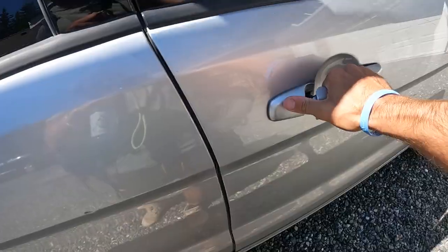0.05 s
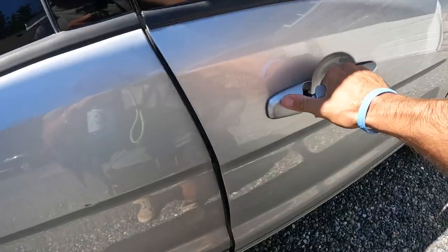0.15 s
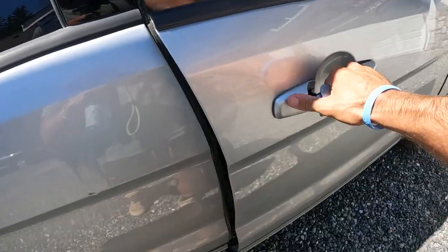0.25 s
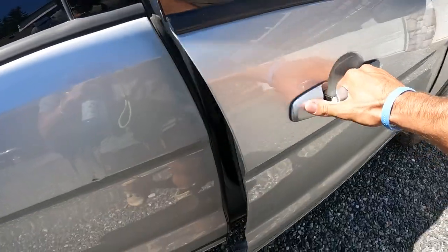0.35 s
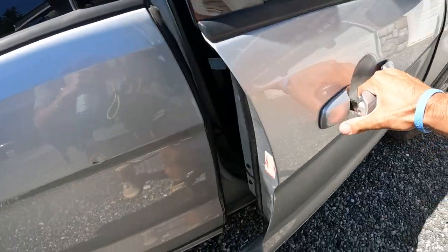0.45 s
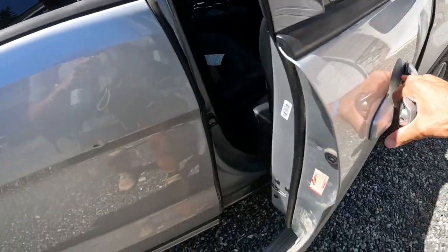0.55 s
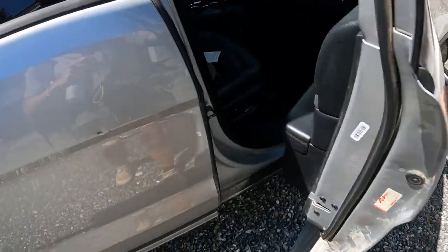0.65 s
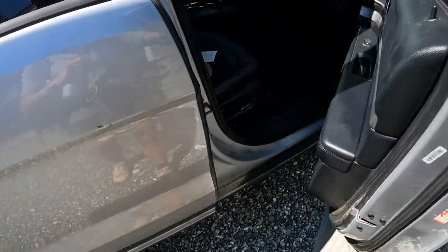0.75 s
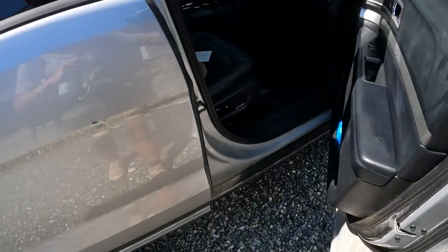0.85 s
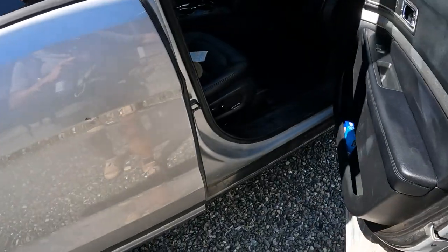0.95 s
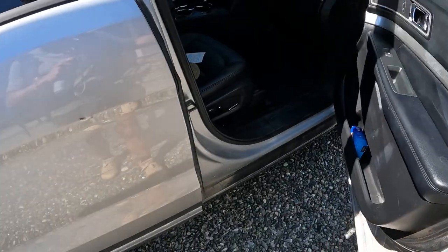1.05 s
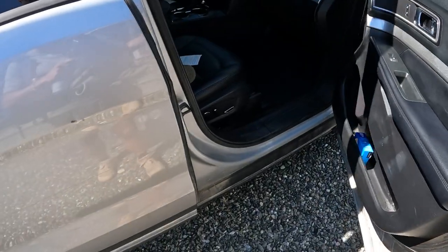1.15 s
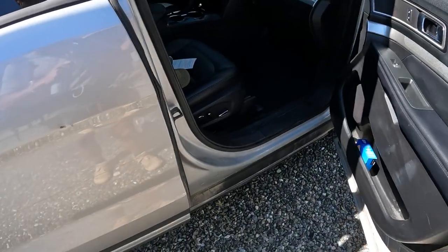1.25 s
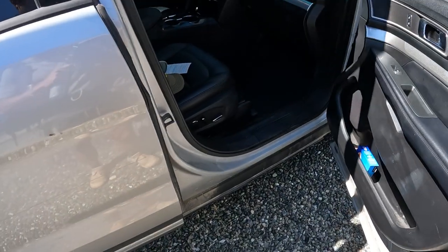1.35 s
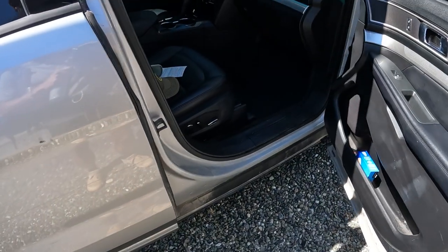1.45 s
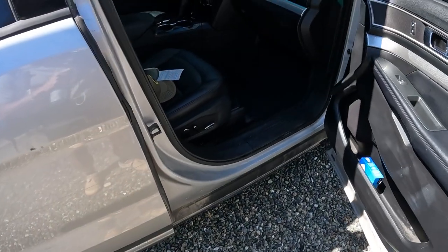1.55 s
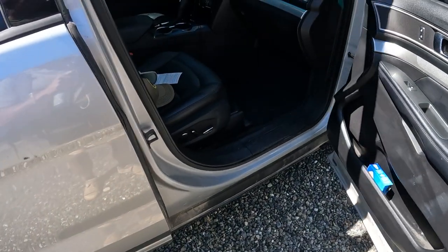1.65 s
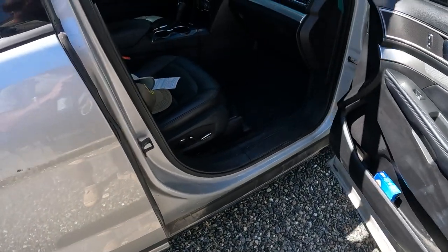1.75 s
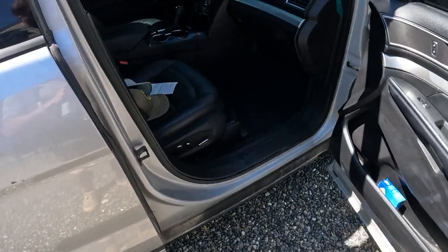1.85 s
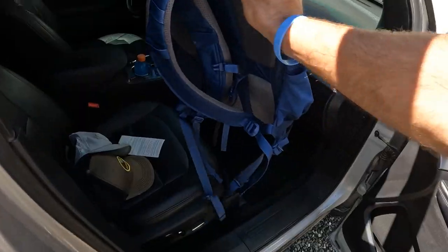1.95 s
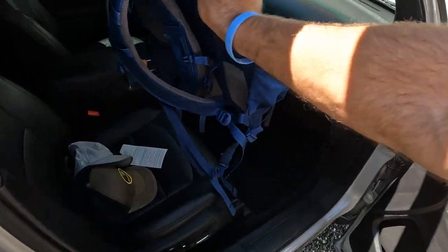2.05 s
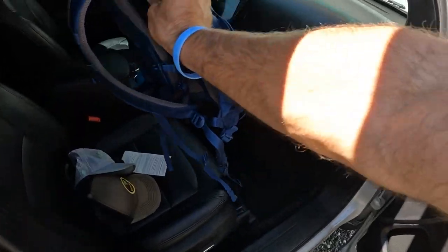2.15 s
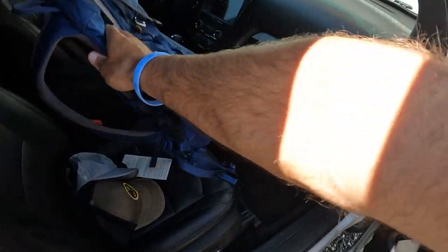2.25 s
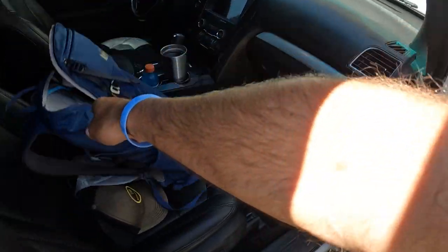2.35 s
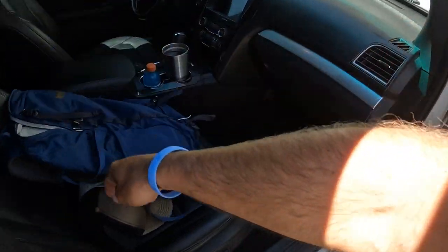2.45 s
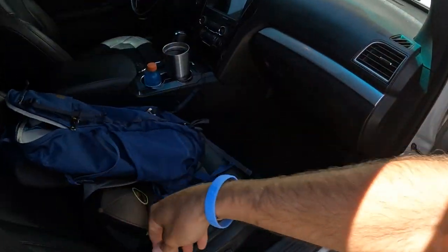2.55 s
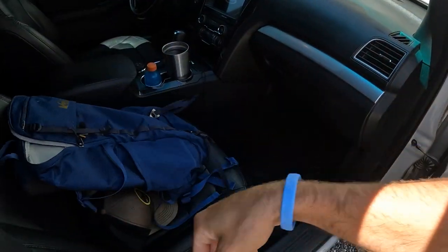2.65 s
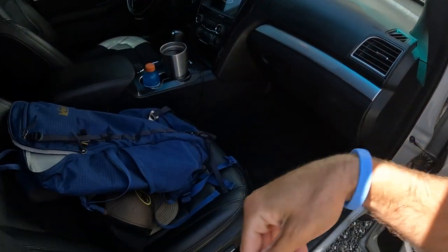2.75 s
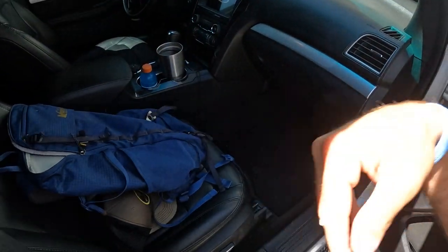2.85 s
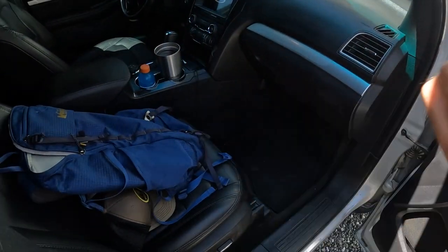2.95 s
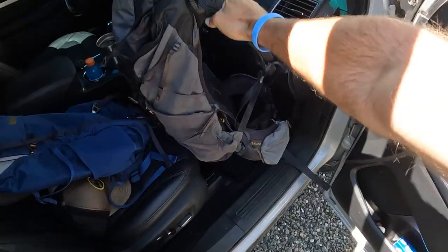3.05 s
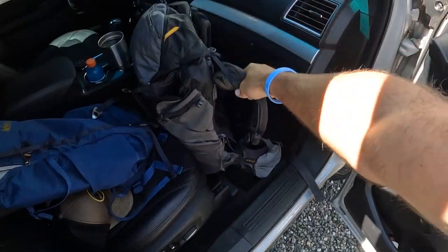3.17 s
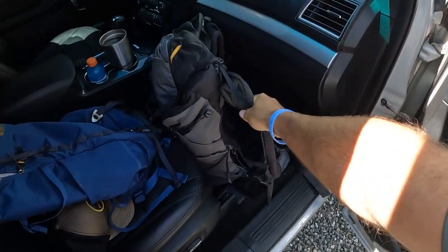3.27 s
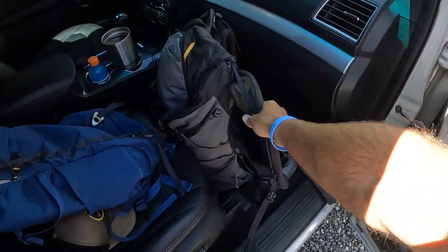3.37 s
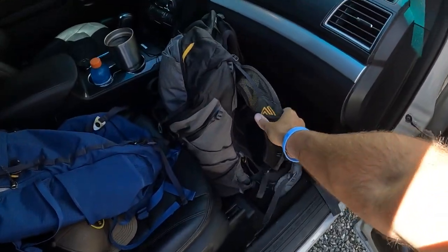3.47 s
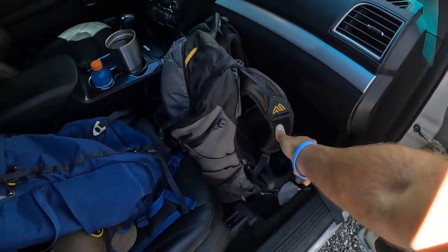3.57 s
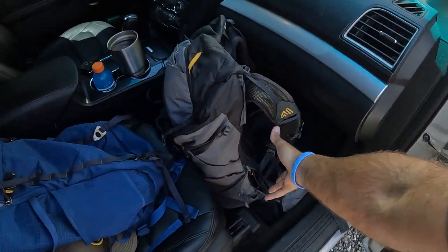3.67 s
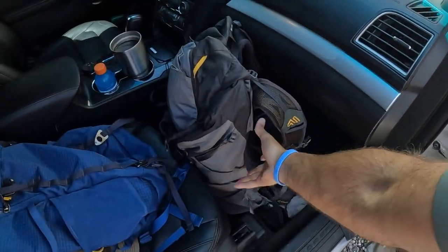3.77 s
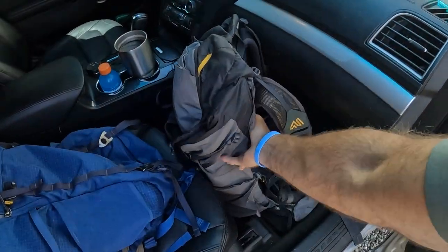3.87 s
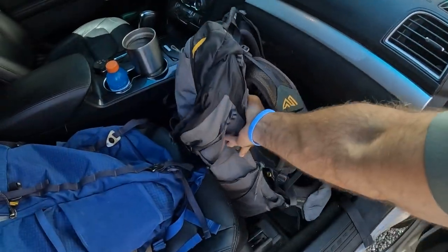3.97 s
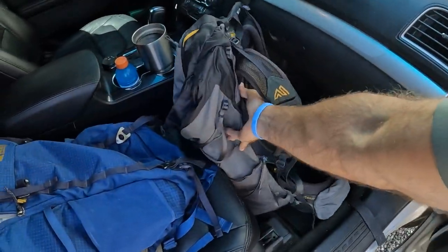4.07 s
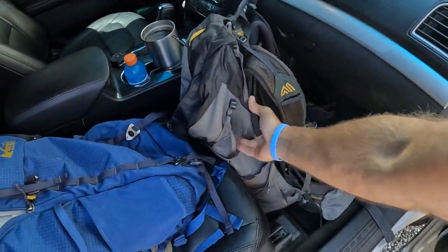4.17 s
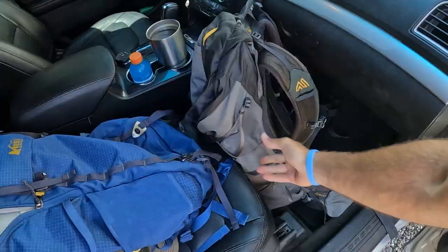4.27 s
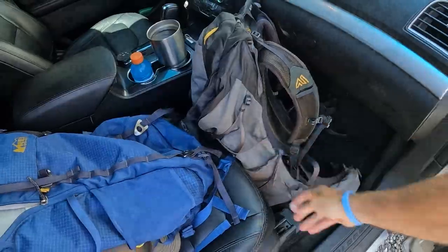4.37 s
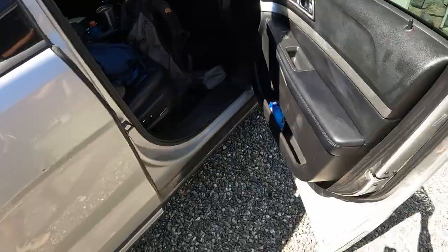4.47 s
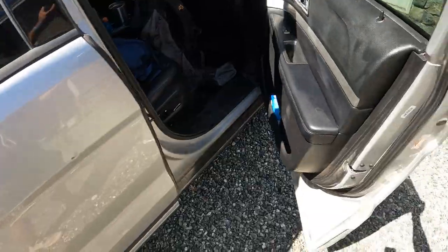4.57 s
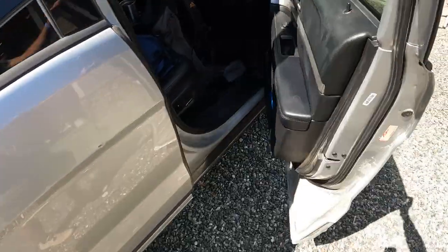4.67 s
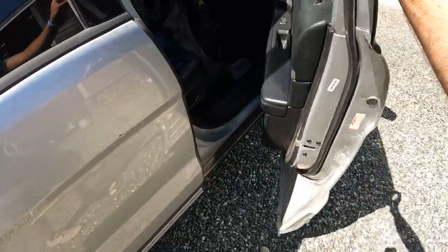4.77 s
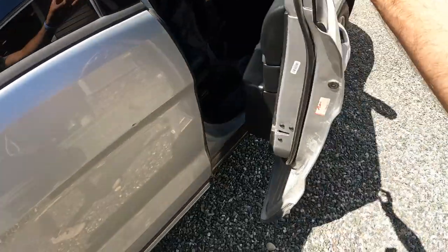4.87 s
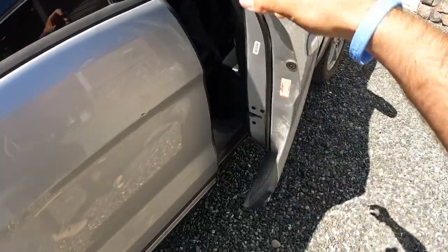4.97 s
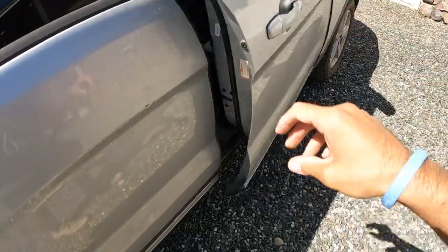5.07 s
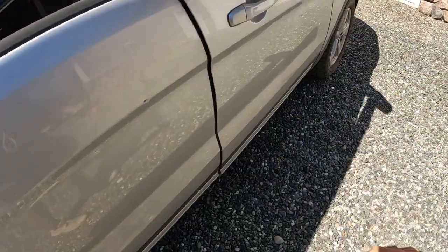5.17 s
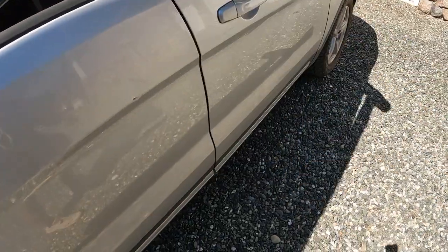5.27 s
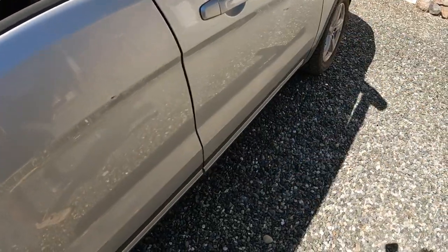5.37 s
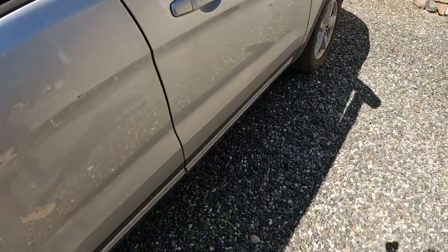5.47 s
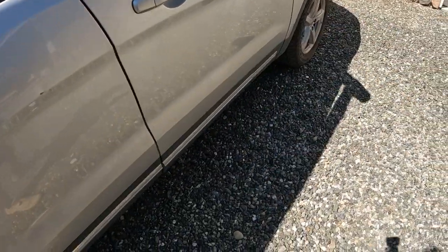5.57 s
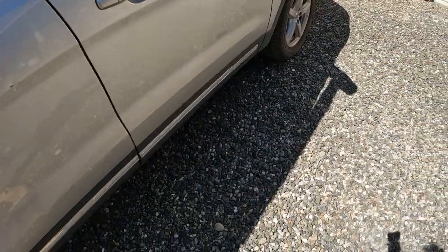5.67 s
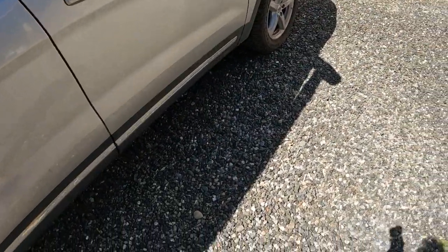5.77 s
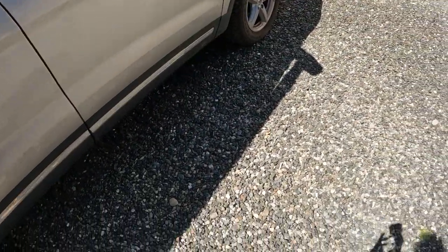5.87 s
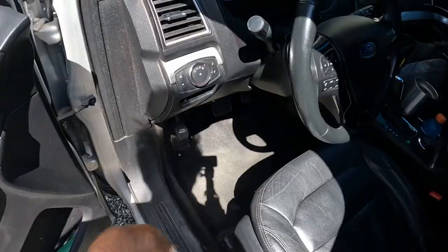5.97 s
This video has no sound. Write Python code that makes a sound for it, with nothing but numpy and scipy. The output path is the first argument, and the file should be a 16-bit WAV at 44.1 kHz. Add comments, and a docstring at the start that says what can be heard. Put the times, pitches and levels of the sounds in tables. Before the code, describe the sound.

Latch clicks, cloth rustle and dull thuds as bags are loaded into a car, ending in a heavy door slam.

```python
"""Loading a car on gravel

A door is unlatched, bags drop on the seat and floor, and the door slams. Latch, buckles and stones
click, the car body thuds, and cloth and gravel rustle by stick-slip friction. Wind and handling rumble
at the two close microphone ports of a body-worn camera, whose housing rings near 1 kHz at each click."""
import sys
import numpy as np
from scipy import signal
from scipy.fft import rfft, irfft
from scipy.io import wavfile
from scipy.ndimage import uniform_filter1d

SR = 44100
rng = np.random.default_rng(int(sys.argv[2]) if len(sys.argv) > 2 else 0)


def to_wav(s):
    """Save 16-bit WAV."""
    ch = np.atleast_2d(s).T  # columns
    pcm = np.round(np.clip(ch, -1, 1) * 32767)  # PCM
    wavfile.write(sys.argv[1], SR, pcm.astype(np.int16))


N = 265305

# Spectrum of fine friction noise. Each row: frequency in Hz, relative density in dB.
FIZZ_SPECTRUM = [(1290, -8.5), (2200, -23), (2390, -5.5), (3440, -5.5), (4200, -8.5), (4570, -7.5),
                 (6010, -7.5), (9330, -18), (10400, -31), (12100, -17.5), (16000, -31)]
# Quiet, unbroken rubbing. Each row: time in seconds, fizz level in dB, body level in dB.
STEADY_RUB = [(0, -62, -50.5), (.4, -59.5, -51), (.62, -53, -45.5), (.95, -47, -41), (1.1, -67, -54.5),
              (1.4, -69, -59.5), (1.85, -64, -54), (2.1, -58, -50.5), (2.7, -52, -50), (3.04, -56, -55),
              (3.75, -67, -53.5), (4.45, -74, -65), (4.75, -56, -46.5), (5.06, -61.5, -54.5),
              (5.27, -57, -53), (5.5, -75, -57.5), (5.8, -78, -65), (6.02, -69, -54)]
# Strokes of cloth and shoe. Each row: peak time in seconds, fizz and body levels in dB,
# seconds to rise 20 dB, seconds to fall 20 dB.
RUB_STROKES = [(.005, -44, -41, -2.3, 0), (.08, -52.5, -42, 0.04, 0.25), (.22, -51, -52, 0, 0.1),
               (.451, -65, -53.5, -1, 0.85), (.85, -52.5, -54, 0.07, 0.26), (1.19, -54, -65, 0.4, 0.1),
               (1.535, -52, -40, 0.03, 0.06), (1.6, -70, -44, 0, 0.1), (1.738, -45.5, -49, 0.07, 0.04),
               (1.946, -54, -46.5, 0.36, 0.24), (2.079, -55.5, -50.5, 0, 0.36),
               (2.391, -41, -44, 0.14, 0.09), (2.48, -33, -28, 0.05, 0.2051),
               (2.78, -48.5, -45.5, -0.2, 0.18), (3.091, -32, -33, .05, 0.3),
               (3.147, -32.5, -33, -0.25, 0.1142), (3.324, -27.5, -27, 0.1, 0.14),
               (3.482, -52.5, -29, -0.3, 0.016), (3.545, -38.5, -43, 0.16, 0.16),
               (3.6, -45, -46, -0.4, -0.06), (3.875, -56, -66, 0.1, 0.2), (4.1, -40, -36, 0.24, 0.34),
               (4.33, -44.5, -43, 0.45, -0.1), (4.485, -51.5, -42.5, -2.1, 0.47),
               (4.522, -44.5, -35.5, -0.09, 0.04), (4.701, -49.5, -46.5, -0.07, 0.08),
               (4.82, -56, -50, 0.1, 0.03), (4.912, -52, -51.5, 0.4, 0), (4.943, -70.5, -47, -0.05, -0.16),
               (5.31, -58, -26, 0.0233, 0.0238), (5.36, -50.5, -25, 0.0379, 0.09),
               (5.541, -73, -62, -8, 0.02), (5.629, -59, -52, -0.4, 0.37), (5.835, -46.5, -45, -0.03, 0.3),
               (5.9, -47, -40.5, 0.05, -0.24), (6.014, -46.5, -49, -0.1, -1)]
RING_T60_S = 0.028  # decay time of the camera housing's ring


def amp(db):
    return 10 ** (np.asarray(db) / 20)


def unit_rms(x):
    return x / np.sqrt(np.mean(x ** 2) + 1e-20)


def wander(samples, length=N):
    """Slow fluctuation of unit RMS: a moving average of white noise."""
    return unit_rms(uniform_filter1d(rng.standard_normal(length), size=samples))


def at_hz(points, hz):
    f, value = np.transpose(points)
    return np.interp(np.log(hz + 1), np.log(f + 1), value)


def curves(rows):
    times, *columns = np.transpose(rows)
    return [np.interp(np.arange(N) / SR, times, column) for column in columns]


def add(mix, start_s, sound):
    part = mix[round(start_s * SR):][:len(sound)]
    part += sound[:len(part)]


def colour(x, spectrum, size=4096):
    """Minimum-phase filter of unit energy, shaped by rows of Hz and dB."""
    db = at_hz(spectrum, abs(np.fft.fftfreq(size, 1 / SR)))
    log_gain = np.log(amp(np.maximum(db, -100)))
    taps = np.fft.ifft(np.exp(np.conj(signal.hilbert(log_gain)))).real
    return signal.oaconvolve(x, taps / np.linalg.norm(taps))[:len(x)]


def hump(hz, skirt_db):
    """A broad band-pass spectrum centred on hz."""
    return [(hz * .35, -skirt_db), (hz * .7, -3), (hz, 0), (hz * 1.4, -3), (hz * 2.8, -skirt_db)]


def resonate(x, hz, width_hz, passes=1):
    """Forced vibration of a damped resonator whose frequency glides along hz."""
    pole = np.exp(-np.pi * width_hz / SR)
    carrier = np.exp(2j * np.pi * np.cumsum(hz) / SR)
    baseband = x / carrier
    for _ in range(passes):
        baseband = signal.lfilter([1 - pole], [1, -pole], baseband)
    return (carrier * baseband).real


def panned(x, pan_db):
    return np.array([x * amp(pan_db / 2), x * amp(-pan_db / 2)])


def decay(t, t60):
    return amp(-60 * t / t60)


def swell(t, rise_s, t60):
    shape = (1 - np.exp(-t / rise_s)) * decay(t, t60)
    return shape / shape.max()


def gesture_power(rows):
    """Power of two layers that grow and decay exponentially; rise and fall times are at least 4 ms."""
    t, power = np.arange(N) / SR, np.zeros((2, N))
    for peak_s, first_db, second_db, rise, fall in rows:
        drop_db = 20 * np.where(t < peak_s, (peak_s - t) / max(rise, .004), (t - peak_s) / max(fall, .004))
        power += amp(np.array([[first_db], [second_db]]) - drop_db) ** 2
    return power


def slips(clump_db, jerks_per_s, jerk_gain, patch_db):
    """Stick-slip friction: tiny slips and a few larger jerks, in clumps, with patchy colour."""
    clumps = amp(clump_db * wander(500))
    sizes = amp(4.1 * np.minimum(rng.exponential(1, N), 3.5)) * rng.choice([-1, 1], N)
    jerks = sizes * (rng.random(N) < jerks_per_s / SR)
    friction = clumps * (rng.standard_normal(N) + jerk_gain * unit_rms(jerks))
    spectra = signal.stft(friction, nperseg=256)[2]
    patches = uniform_filter1d(rng.standard_normal(spectra.shape), size=7, axis=0)
    patches = unit_rms(uniform_filter1d(patches, size=12, axis=1))
    return unit_rms(signal.istft(spectra * amp(patch_db * patches), nperseg=256)[1][:N])


def rustle():
    """Friction of cloth and gravel radiates a fine, dense fizz over a coarser body."""
    # Each row: frequency in Hz, relative density in dB.
    body_spectrum = [(350, -2.5), (650, -1), (900, 2), (1150, 3), (1400, 0), (1800, -1.5), (2700, -11),
                     (3800, -35.5)]
    fizz_level, body_level = np.sqrt(amp(curves(STEADY_RUB)) ** 2 + gesture_power(RUB_STROKES))
    fizz = colour(slips(clump_db=1.66, jerks_per_s=900, jerk_gain=0.58, patch_db=1.6), FIZZ_SPECTRUM)
    body = colour(slips(clump_db=1.22, jerks_per_s=400, jerk_gain=0.75, patch_db=2.77), body_spectrum)
    return fizz_level * fizz + body_level * body


def rumble():
    """Turbulent wind and lurches of hand and car make low pressure fluctuations at the ports."""
    # The two bands of rumble. Each row: frequency in Hz, relative density in dB.
    deep_spectrum = [(8.8, -33.5), (15, 13), (32, 0), (40, 1.5), (50, -1.5), (65, -3), (85, -3.5),
                     (110, -34), (190, -120)]
    upper_spectrum = [(38, -6), (65, -9.5), (156, -7), (211, -12), (344, -13.5), (460, -22.5), (602, -27.5),
                      (650, -51), (840, -89), (1430, -120)]
    # Each row: time in seconds, deep level in dB, upper level in dB.
    wind_levels = [(0, -45, -50), (.3, -44, -50), (.62, -46, -41.5), (.94, -37, -43.5), (1.16, -49, -48.5),
                   (1.5, -44, -45.5), (1.96, -41.5, -47), (2.18, -47, -65), (2.4, -42, -42),
                   (2.65, -36.5, -39.5), (3.05, -45, -57.5), (3.45, -36.5, -42), (3.85, -49.5, -65),
                   (4.0, -37, -42), (4.5, -40.5, -53.5), (4.75, -38, -46.5), (5.1, -43.5, -49.5),
                   (5.75, -31, -57), (6.02, -26.5, -58)]
    # Each row: peak time in seconds, deep and upper levels in dB, seconds to rise and to fall 20 dB.
    lurches = [(.13, -20.5, -24, 0.12, 0.2), (1.02, -27, -28.5, 0.3, 0.21), (1.66, -28.5, -61, 0.3, 0.27),
               (1.86, -42, -31, 0.07, 0.23), (1.93, -35, -55, -0.1, 0.17), (2.03, -36, -40.5, -0.5, 0.12),
               (2.5, -21, -29, 0.05, 0.15), (3.12, -52, -35, 0.02, 0.66), (3.35, -32, -28, 0.13, 0.23),
               (4.13, -33, -31, 0.15, 0.09), (4.57, -25.5, -34, -0.01, 0.1), (4.8, -34.5, -57, 0.1, 0.45),
               (5.0, -36, -40, 0.5, -0.4), (5.33, -25, -28.5, 0.1, 0.23), (5.46, -25, -30.5, 0.1, 0.14),
               (5.56, -22, -45, 0.05, 0.17), (5.78, -33, -34, -0.33, -0.08), (5.9, -23.5, -33, 0.17, 0.06)]
    wind_deep, wind_upper = amp(curves(wind_levels))
    lurch_deep, lurch_upper = np.sqrt(gesture_power(lurches))
    lumps = amp(3.5 * wander(1200))
    deep = unit_rms(colour(rng.standard_normal(N), deep_spectrum, size=32768))
    upper = unit_rms(colour(lumps * rng.standard_normal(N), upper_spectrum, size=16384))
    sway_db = 3.5 * wander(3000)
    # The deep wind favours the right port; the lurches reach both nearly alike.
    deep_level = np.hypot(panned(wind_deep, sway_db - 3.5), panned(lurch_deep, sway_db - 1))
    return deep_level * deep + np.hypot(wind_upper, lurch_upper) * upper


def outdoor_wash():
    """Distant outdoor sounds add incoherently into a faint, steady noise."""
    # Each row: frequency in Hz, relative density in dB.
    spectrum = [(88, -35), (150, 4), (201, -1), (675, -8.5), (1060, 1.5), (2700, -55), (5910, -40),
                (7620, -19), (10200, -107), (12200, -51), (16000, -59)]
    return amp(-62.5) * unit_rms(colour(rng.standard_normal(N), spectrum))


def ticks():
    """A Poisson process of tiny cracks, each with a ring of the housing, louder as the rubbing grows."""
    # Each row: housing ring in Hz, crack in Hz.
    kinds = [(950, 1100), (1100, 1200), (1200, 4200), (1050, 5500), (1300, 9700)]
    ticks_per_s = 80
    out, t = np.zeros(N), np.arange(600) / SR
    sizes = amp(2.5 * np.minimum(rng.exponential(1, N), 3))
    impacts = sizes * (rng.random(N) < ticks_per_s / SR)
    kind = rng.integers(0, len(kinds), N)
    for k, (ring_hz, crack_hz) in enumerate(kinds):
        burst = rng.standard_normal(len(t)) * decay(t, t60=0.0027)
        crack = colour(colour(burst, hump(crack_hz, 9.5), size=512), FIZZ_SPECTRUM, size=512)
        ring = decay(t, RING_T60_S) * np.sin(2 * np.pi * ring_hz * t)
        out += signal.oaconvolve(impacts * (kind == k), amp(4) * crack + amp(7) * ring)[:N]
    rub_power = amp(curves(STEADY_RUB)[0]) ** 2 + 0.17 * gesture_power(RUB_STROKES)[0]
    return np.sqrt(rub_power) * out


def clicks():
    """A sharp blow, a damped resonance of the camera housing mostly near 1 kHz, and a bright crack."""
    # Each row: start in seconds, level in dB, ring in Hz, relative crack level in dB, crack in Hz.
    impacts = [(.009, -21.5, 1110, -39, 2270), (.056, -31, 1000, -12, 3300), (.138, -11.5, 1243, -23, 2210),
               (0.258, -33, 1100, -9, 2310), (.341, -30.5, 930, -6.5, 2730), (0.4297, -26, 980, -10, 6140),
               (.55, -32, 1450, -14.5, 2260), (.608, -24, 1270, -8, 2270), (.7135, -24, 1200, -3, 2150),
               (.753, -22, 1160, -4.5, 2190), (0.886, -19, 920, -25, 2500), (.897, -9, 950, -32, 5700),
               (.972, -13.5, 900, -14, 2500), (1.087, -32.5, 1030, -9, 3250), (1.321, -33.5, 977, -7, 2400),
               (1.927, -28.5, 970, -23, 3720), (1.978, -24.5, 1830, -5, 2170), (1.989, -2, 1327, -11, 2570),
               (2.072, -19, 1208, -11.5, 1830), (2.088, -28.5, 1240, -20, 2000), (2.136, -38, 960, 1, 5670),
               (2.16, -33, 983, -6, 2290), (2.334, -26.5, 1010, -18, 2510), (2.423, -26, 970, -4, 2220),
               (2.4502, -9.5, 700, -14.5, 3060), (2.461, -15.5, 1100, -2, 4640),
               (2.488, -16, 1150, -2, 2900), (2.516, -17, 955, -12, 2310), (2.524, -18.5, 1490, -1, 3520),
               (2.781, -21, 1050, -26, 3100), (2.803, -29, 1140, -24, 2420), (3.067, -25, 910, -4, 5500),
               (3.084, -25, 1440, 3.5, 3240), (3.291, -21.5, 1170, 2, 2170),
               (3.313, -9.5, 1160, -10.5, 2980), (3.342, -14, 970, -0.5, 5800), (3.472, -30, 706, 4, 2230),
               (3.877, -35, 1365, 10, 2610), (3.921, -37, 1840, 2, 2700), (4.047, -27.5, 840, -1.5, 2370),
               (4.275, -23, 1120, 5, 3520), (4.577, -23, 980, -32.5, 2510), (4.605, -29, 1100, -6, 6200),
               (4.688, -20, 915, -13.5, 4830), (4.71, -18.5, 940, -39, 2260),
               (4.754, -27.5, 1100, -1, 2030), (4.96, -23.5, 1075, -16, 4800),
               (5.021, -31.5, 940, -10, 4800), (5.043, -28.5, 1150, -36, 2350),
               (5.135, -33.5, 1120, -16, 5610), (5.228, -45, 1000, 4, 6100), (5.296, -7, 636, -11.5, 3300),
               (5.306, -5, 1083, -22, 3400), (5.314, -10, 1300, -22, 3400), (5.523, -37, 600, -7, 4700),
               (5.537, -26, 970, -26, 2270), (5.547, -35, 890, -5, 2050), (5.601, -36, 950, -20, 2520),
               (5.618, -22, 1020, -15, 2640), (5.644, -29.5, 780, -4.5, 2080),
               (5.82, -30.5, 1300, -4.5, 4480)]
    # Each row: frequency in Hz, relative density in dB.
    crack_spectrum = [(1060, -73), (1800, 3), (2220, -0.5), (2870, 1), (3440, -6), (4170, -5), (6410, -2.5),
                      (10200, -26.5), (12400, -29), (16000, -31)]
    out, t = np.zeros(N), np.arange(4000) / SR
    attack = np.minimum(t / 0.000088, 1)
    for start, db, hz, crack_db, crack_hz in impacts:
        noise = rng.standard_normal((2, len(t)))
        blow = np.sin(2 * np.pi * 1.1 * hz * t) * decay(t, t60=0.00085)
        bounces = colour(noise[0], hump(hz * 1.203, 37.8), size=1024)
        ring = (np.sin(2 * np.pi * hz * t) + .5 * bounces) * decay(t, RING_T60_S)
        hiss = colour(colour(noise[1], crack_spectrum, size=1024), hump(crack_hz, 5.3), size=512)
        crack = .5 * (unit_rms(hiss) + np.sin(2 * np.pi * crack_hz * t)) * decay(t, t60=0.022)
        add(out, start, amp(db) * (0.075 * blow + 0.61 * ring + amp(crack_db) * crack) * attack)
    return out


def thuds():
    """Heavy blows excite two low modes of the car body and shake its resonant panels."""
    # Each row: start in seconds, level in dB, boom in Hz, its 60 dB decay time in seconds,
    # relative clatter level in dB, knock in Hz, relative knock level in dB.
    blows = [(.078, -29, 174, 0.32, -8.5, 192, -23), (.132, -15.5, 133, 0.16, -2.5, 302.4, 1),
             (.976, -9, 114.4, 0.089, -8, 206.5, -8), (1.007, -11, 105, 0.097, -16.5, 297, -17),
             (1.283, -43.5, 75, 0.049, -7, 307, 7), (1.533, -25, 146, 0.055, -12, 193, -21),
             (1.548, -30.5, 123, 0.14, -13.5, 196, -1), (1.845, -30, 88.5, 0.2, -13.5, 338.5, 1.5),
             (1.865, -29.5, 100, 0.054, -24, 255, -17), (1.989, -28.5, 141, 0.06, 1.5, 280, 7),
             (2.461, -19.5, 114, 0.11, -8.5, 213, 0), (2.49, -22.5, 141, 0.2, -5.5, 196, -3),
             (3.279, -16, 108, 0.35, -8.5, 274, -17), (3.31, -12.5, 120, 0.13, -15.5, 233, -5),
             (4.116, -23.5, 105, 0.061, -9, 224, -3.5), (4.575, -23, 83.5, 0.051, -15, 230, -8.5),
             (4.683, -36, 99, 0.31, -7, 264, -1), (5.296, -19.5, 76, 0.12, -2, 267, 6),
             (5.34, -14.5, 121.5, 0.15, -6, 286, -6), (5.378, -20.5, 149, 0.15, -6, 196, -13),
             (5.952, -18.5, 80, 0.05, -21, 197, -1)]
    # Each row: frequency in Hz, relative density in dB.
    shake_spectrum = [(71, -28), (120, -1.5), (216, -7.5), (321, -8), (424, -13), (773, -18.5), (1180, -18),
                      (2130, -31), (2320, -33.5), (3450, -41), (4000, -48), (5200, -87), (8800, -120)]
    # Each row: frequency in Hz, bandwidth in Hz, gain in dB.
    panel_modes = [(300.5, 59, 0), (422, 59, 1), (590, 56, 2), (1147, 73, -9)]
    out, t = np.zeros(N), np.arange(SR // 2) / SR
    panels = sum(amp(db) * 2 * np.pi * width / SR * np.exp(-np.pi * width * t) * np.cos(2 * np.pi * hz * t)
                 for hz, width, db in panel_modes)
    for start, db, hz, t60, clatter_db, knock_hz, knock_db in blows:
        shape = swell(t, rise_s=0.0058, t60=t60)
        shake = shape * unit_rms(colour(rng.standard_normal(len(t)), shake_spectrum))
        clatter = shake + signal.fftconvolve(shake, panels)[:len(t)]
        boom = shape * np.sin(2 * np.pi * hz * t)
        knock = shape ** 1.55 * np.sin(2 * np.pi * knock_hz * t)  # dies sooner than the boom
        add(out, start, amp(db) * (boom + amp(knock_db) * knock + amp(clatter_db) * clatter))
    return out


def snaps():
    """A brief transient has a broad spectrum: a dry burst, with a ping that lasts twice as long."""
    # Each row: start in seconds, level in dB, centre frequency in Hz.
    events = [(0.0906, -24, 3460), (0.112, -28, 4300), (.121, -21.5, 3500), (.518, -40, 5500),
              (.572, -38.5, 2300), (.595, -36.5, 3000), (.665, -42, 4000), (1.9893, -10, 2820),
              (2.473, -19, 1200), (2.496, -21, 2000), (2.515, -18, 2520), (2.57, -24.5, 1500),
              (2.593, -25.5, 1400), (2.765, -31, 1300), (.7135, -19.5, 2700), (0.744, -32, 3800),
              (.791, -32.5, 5200), (.828, -29, 3800), (2.804, -33, 1500), (3.483, -29, 1590),
              (3.593, -29, 1000), (3.083, -19, 5700), (4.722, -37, 5500), (4.734, -40, 5500),
              (4.916, -44, 5200), (5.089, -45, 5000), (5.217, -44, 8000), (5.256, -54, 5500)]
    t60 = 0.008
    out, t = np.zeros(N), np.arange(1000) / SR
    for start, db, hz in events:
        burst = colour(rng.standard_normal(len(t)) * decay(t, t60), hump(hz, 21.6), size=512)
        ping = np.sin(2 * np.pi * hz * t) * decay(t, 2 * t60)
        add(out, start, amp(db) * (burst / abs(burst).max() + .6 * ping))
    return out


def scuffs():
    """Brief sliding friction makes a gritty burst of noise that swells and dies."""
    # Each row: start in seconds, level in dB, band centre in Hz, 60 dB decay time in seconds.
    events = [(0.134, -32.5, 2760, 0.092), (.441, -37, 6650, 0.11), (0.485, -42, 6100, 0.061),
              (.895, -29.5, 6850, 0.059), (.972, -37.5, 3450, 0.12), (1.523, -47, 2900, 0.17),
              (1.569, -49, 2750, 0.14), (1.987, -35.5, 2680, 0.1), (2.297, -44, 5360, 0.059),
              (2.488, -34, 2810, 0.27), (3.0825, -23.5, 5570, 0.039), (3.345, -35, 5840, 0.053),
              (4.272, -41, 3400, 0.089), (5.298, -33, 3360, 0.41), (5.302, -28.5, 4420, 0.12),
              (5.344, -32, 3900, 0.1), (5.396, -44, 2760, 0.035), (5.82, -42.5, 5540, 0.049)]
    out, t = np.zeros(N), np.arange(SR // 2) / SR
    for start, db, hz, t60 in events:
        grit = rng.standard_normal(len(t)) * amp(2.5 * wander(120, len(t)))
        crunch = unit_rms(colour(colour(grit, FIZZ_SPECTRUM), hump(hz, 13.5), size=512))
        add(out, start, amp(db) * swell(t, rise_s=0.0031, t60=t60) * crunch)
    return out


def hinge():
    """Stick-slip in the swinging door's hinge drives a narrow, sinking resonance."""
    # Each row: time in seconds, level in dB, resonance in Hz.
    swing = [(.42, -81, 1450), (.5, -47.5, 1460), (.62, -48, 1180), (.8, -41, 1100), (.9, -62, 1050)]
    t = np.arange(N) / SR
    db, hz = curves(swing)
    friction = slips(clump_db=3.7, jerks_per_s=110, jerk_gain=2.5, patch_db=0.99)
    swinging = (t > swing[0][0]) & (t < swing[-1][0])
    return amp(db) * swinging * unit_rms(resonate(friction, hz, width_hz=180))


def drags():
    """Short rubs sing as stick-slip friction drives a gliding resonance."""
    # Each row: start and length in seconds, level in dB, first and last pitch in Hz,
    # bandwidth of one pass in Hz.
    rubs = [(0.932, 0.019, -35.5, 2100, 2050, 60), (0.938, 0.023, -42, 3500, 3400, 90),
            (2.212, 0.039, -46, 1020, 1000, 200), (3.057, 0.13, -31, 1320, 1630, 920),
            (3.16, 0.16, -39, 1150, 980, 500), (3.415, 0.026, -36.5, 1550, 1500, 200),
            (3.528, .035, -44, 3100, 2850, 500), (3.527, 0.08, -47, 1420, 1300, 250),
            (3.536, 0.085, -40, 595, 644, 500), (3.667, 0.037, -43, 740, 695, 400),
            (4.747, 0.17, -52.5, 5600, 5160, 2470)]
    fade_s = 0.014
    out = np.zeros(N)
    friction = slips(clump_db=1.6, jerks_per_s=500, jerk_gain=0.86, patch_db=0.94)
    for start, length, db, first_hz, last_hz, width_hz in rubs:
        t = np.arange(0, length, 1 / SR)
        glide = np.linspace(first_hz, last_hz, len(t))
        rub = resonate(friction[round(start * SR):][:len(t)], glide, width_hz, passes=2)
        fade = np.minimum(np.minimum(t, t[::-1]) / fade_s, 1)
        add(out, start, amp(db) * unit_rms(rub) * fade)
    return out


def door_slam():
    """The door compresses the cabin air in four damped shoves as it shuts and bounces on its seal."""
    slam_s, bounce_s, cabin_hz = 5.308, .049, 37.5
    out, t = np.zeros(N), np.arange(SR // 2) / SR
    shove = decay(t, t60=0.18) * np.sin(2 * np.pi * cabin_hz * t)
    for k in range(4):
        add(out, slam_s + k * bounce_s, amp(-5.5 - 3.5 * k) * shove)
    return out


def scene():
    """The sources add by superposition; only the rumble has two channels."""
    contacts = rustle() + clicks() + snaps() + ticks() + hinge() + drags() + scuffs() + thuds()
    return contacts + door_slam() + outdoor_wash() + rumble()


def record(dry):
    """Two ports differ in level and phase, and by scattering off the moving wearer and the car."""
    # Each row: frequency in Hz, left minus right level in dB.
    tilt = [(60, -2), (180, 0.5), (550, -0.5), (1650, 0.5), (4970, -0.5), (15000, 6)]
    # Each row: frequency in Hz, phase lead of the left port in radians.
    lead = [(300, 0), (1200, -.15), (3000, -.55), (5200, -.2), (11000, 0)]
    # Each row: frequency in Hz, relative level of scattered sound in dB.
    scatter = [(250, -23), (600, -17), (1500, -13), (3000, -11), (6000, -13.5), (9000, -11), (13000, -5.5)]
    # Treble loss of the microphone. Each row: frequency in Hz, gain in dB.
    response = [(11000, -0.5), (13500, -12.5), (16000, -16)]
    above_bass = signal.sosfiltfilt(signal.butter(2, 200, "high", fs=SR, output="sos"), dry.mean(0))
    hz, _, spectra = signal.stft(above_bass, SR, nperseg=256)
    chance = rng.standard_normal((2, *spectra.shape))
    drift = unit_rms(uniform_filter1d(uniform_filter1d(chance, size=3, axis=1), size=5, axis=2))
    # tanh turns half the log left/right ratio into a side/mid ratio.
    steady = np.tanh(np.log(amp(at_hz(tilt, hz))) / 2 + .5j * at_hz(lead, hz))
    scattered = amp(at_hz(scatter, hz))[:, None] * (drift[0] + 1j * drift[1])
    side = signal.istft(spectra * (steady[:, None] + scattered), SR, nperseg=256)[1][:N]
    ports = dry + np.array([side, -side])
    heard = irfft(rfft(ports) * amp(at_hz(response, np.fft.rfftfreq(N, 1 / SR))), N)
    fade_out = np.minimum(np.arange(N)[::-1] / 100, 1)
    low_pass = signal.firwin(511, cutoff=15700, window=("kaiser", 9), fs=SR)
    return signal.oaconvolve(heard * fade_out, low_pass[None], "same")


dry = scene()
out = record(dry)
to_wav(out)
```